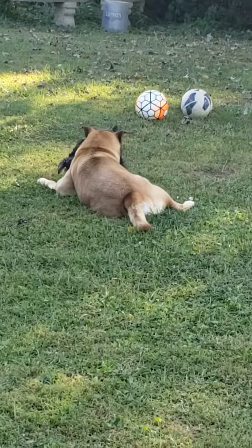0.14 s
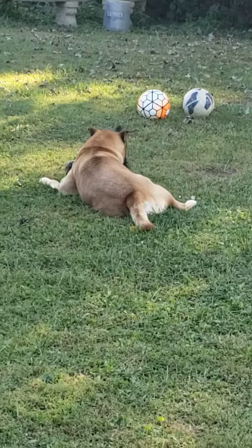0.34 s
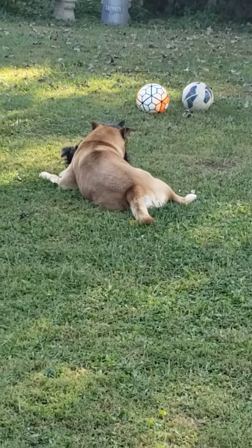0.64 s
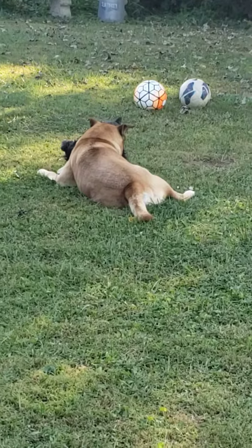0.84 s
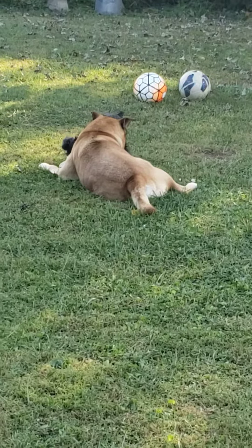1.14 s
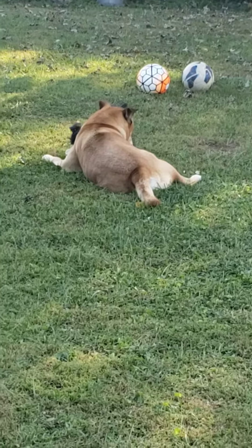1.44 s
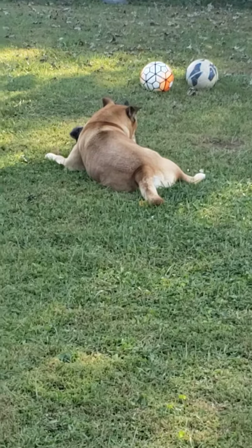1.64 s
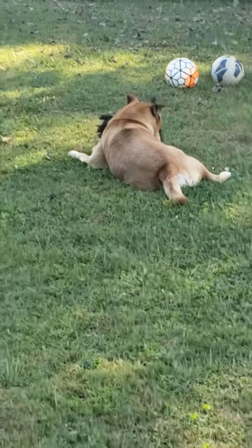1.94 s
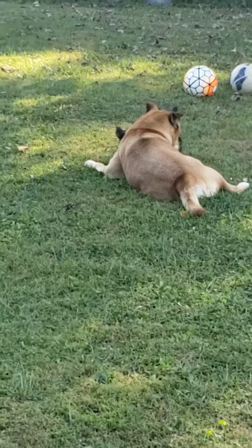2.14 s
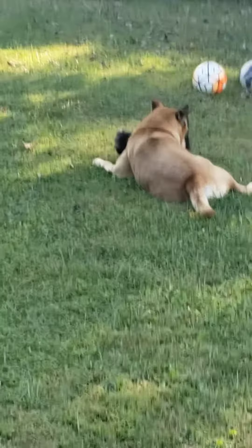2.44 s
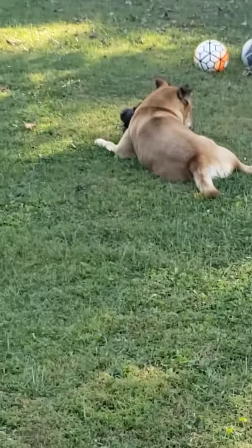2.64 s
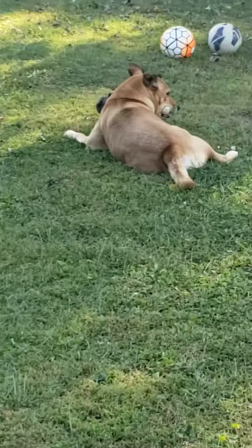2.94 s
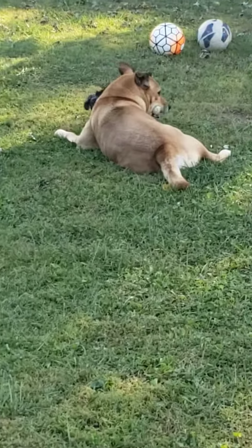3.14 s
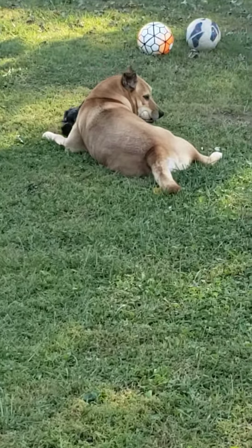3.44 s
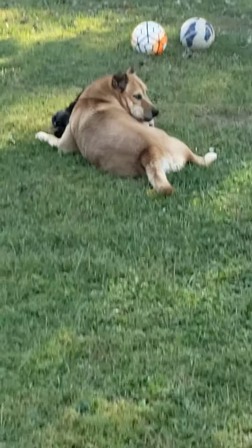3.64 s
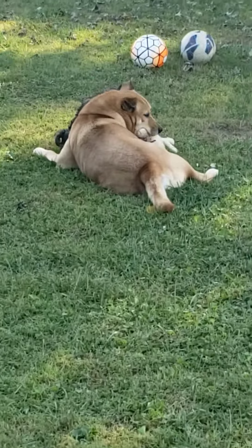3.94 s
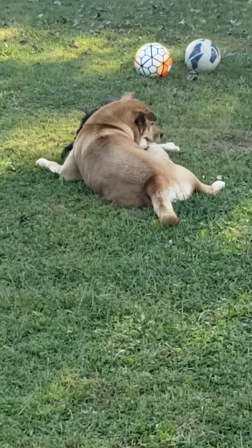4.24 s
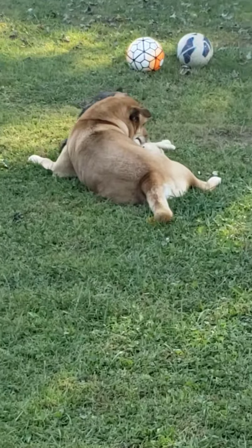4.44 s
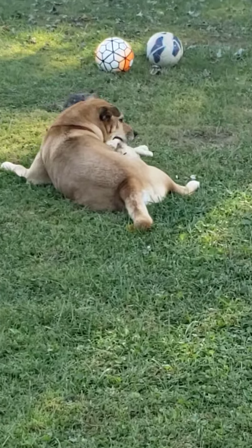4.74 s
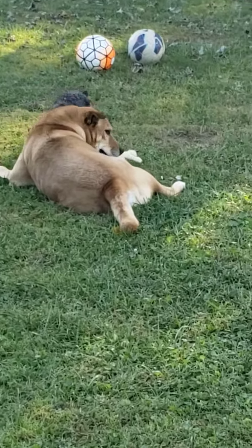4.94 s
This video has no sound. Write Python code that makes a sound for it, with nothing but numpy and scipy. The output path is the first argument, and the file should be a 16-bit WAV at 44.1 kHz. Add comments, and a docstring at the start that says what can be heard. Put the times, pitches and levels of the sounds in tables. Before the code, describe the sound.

A hand-held phone picks up a constant throbbing cicada chorus and uneven traffic rumble from afar. Low wind flutters come and go on the left, peaking in a cluster of dull thumps around 1.9 seconds, then mostly die away after three. Close crisp fabric rubs, tiny snaps and light casing taps follow on the right, with one faint distant whistle and a late gentle swell of noise. The dog makes no sound.

```python
"""Cicadas on a summer evening

A lawn: cicadas buzz in the trees, their noise clicks throbbing and coloured into a chorus, over the
shaped noise of distant traffic. Faint gliding tones whistle far off and a soft swell of noise whooshes.
Low noise and ringing eddies are wind on the left microphone port of a hand-held phone; dense grains
of rustling cloth and finger taps that ring the casing come from near the right port."""
import sys
import numpy as np
from scipy import signal
from scipy.fft import rfft, irfft
from scipy.io import wavfile
from scipy.ndimage import uniform_filter1d

SR = 44100
rng = np.random.default_rng(int(sys.argv[2]) if len(sys.argv) > 2 else 0)


def dump(signal):
    """Clip the signal to [-1, 1] and save it as 16-bit WAV at the path in sys.argv[1]."""
    limited = np.clip(np.atleast_2d(signal).T, -1, 1)
    pcm = np.round(limited * 32767).astype(np.int16)
    wavfile.write(sys.argv[1], SR, pcm)


N = 224160


def from_db(db):
    """Amplitude gain of a level in dB."""
    return 10 ** (np.asarray(db) / 20)


def rms_one(x):
    """Scale a signal to rms 1."""
    return x / np.sqrt(np.mean(x ** 2) + 1e-20)


def in_time(rows):
    """Value of a (time_s, value) curve at every sample, joined by straight lines."""
    return np.interp(np.arange(N) / SR, *np.transpose(rows))


def columns_at_hz(table):
    """Each value column of a table over the FFT bins, joined on a log frequency axis."""
    hz, *columns = np.transpose(table)
    log_bins = np.log(np.arange(N // 2 + 1) * SR / N + 1)   # 1 Hz added: no log of zero
    values = np.array([np.interp(log_bins, np.log(hz), column) for column in columns])
    return values, np.exp(log_bins), hz


def coloured(x, table):
    """Give unit white noise the table's dB per Hz, one column per channel, steeply closed at both ends."""
    level_db, bins, hz = columns_at_hz(table)
    skirt = 1 / (1 + (hz[0] / bins) ** 8) / (1 + (bins / hz[-1]) ** 8)
    return irfft(rfft(x) * from_db(level_db) * skirt, N) * np.sqrt(SR / 2)


def drift(rate_hz):
    """Random wander of rms 1: white noise through two equal low-pass poles at rate_hz."""
    r = np.exp(-2 * np.pi * rate_hz / SR)
    noise = rng.standard_normal(N + SR)
    settled = signal.lfilter([1], [1, -2 * r, r * r], noise)[SR:]
    return rms_one(settled)


def ring(clicks, hz, t60_s):
    """A resonance: each unit click starts a sine of height 1 that decays by 60 dB in t60_s."""
    r = from_db(-60 / (t60_s * SR))
    w = 2 * np.pi * hz / SR
    return signal.lfilter([0, np.sin(w)], [1, -2 * r * np.cos(w), r * r], clicks + 1e-18)


def strikes(times_s, gains):
    """One single-sample click per event."""
    clicks = np.zeros(N)
    clicks[np.round(np.array(times_s) * SR).astype(int)] = gains
    return clicks


def swell_db(start_s, hold_s, rise_db_per_s, fall_db_per_s):
    """Level that rises to 0 dB at the start, holds and falls, in straight lines of dB."""
    t = np.arange(N) / SR - start_s
    return np.minimum(0, np.minimum(rise_db_per_s * t, fall_db_per_s * (hold_s - t)))


def traffic():
    """Distant noise: long waves reach both ports alike, the right a little later; bass and hush swell apart."""
    # colour before the swells: pitch_hz, left_db_per_hz, right_db_per_hz
    far_colour = [(21.9, -100, -86), (31.7, -84, -76), (43.3, -74, -73.5), (72, -67.5, -67.5),
                  (111.4, -74, -77), (153, -83.5, -84.5), (220, -85.5, -85.5), (425, -93.5, -100),
                  (540, -87, -98), (754, -89.5, -90.5), (915, -89, -95.5), (1560, -92, -99),
                  (2010, -87, -104.5), (2300, -91.5, -103), (2930, -107, -109), (4920, -113, -115)]
    # left-right likeness: pitch_hz, correlation (0-1)
    likeness = [(60, 0.93), (130, 1), (290, 0.91), (640, 1), (1410, 0.08), (3100, 0.32), (6820, 0.03),
                (15000, 0.01)]
    # swell of the bass: time_s, level_db
    bass_swell = [(0, -1), (1.1, 2), (1.4, 5), (1.8, 1.5), (2.4, 0), (2.65, -4.5), (3.1, 2), (3.55, -2.5),
                  (3.85, 2), (4.4, -5.5), (5.08, 0)]
    # swell of the hush above the bass: time_s, level_db
    hush_swell = [(0, -0.5), (.6, 0), (2.6, 0.97), (4.2, -0.2), (4.7, 1), (4.92, 2), (5.08, 1)]
    right_lag_s = 0.00025

    alike = columns_at_hz(likeness)[0][0]
    left, other = rfft(rng.standard_normal((2, N)))
    lag = np.exp(-2j * np.pi * np.arange(N // 2 + 1) * SR / N * right_lag_s)
    right = alike * left * lag + np.sqrt(1 - alike ** 2) * other
    far = coloured(irfft([left, right], N), far_colour)
    bass = signal.sosfiltfilt(signal.butter(2, 150, fs=SR, output="sos"), far)
    hush = far - bass
    return hush * from_db(in_time(hush_swell)) + bass * from_db(in_time(bass_swell))


def whistle():
    """Far breathy tones, perhaps birds: slow noise rides on a sine that sags in pitch; echoes blur it."""
    # whistles: start_s, hold_s, start_hz, sag_hz_per_s, nominal level_db, left_minus_right_db
    calls = [(3.92, 0.1, 3590, 1200, -78, 0), (3.93, .06, 2780, 1100, -81, 6)]
    # echoes off the trees: delay_s, level_db
    echoes = [(.047, -3), (.11, -8)]
    rise_db_per_s, fall_db_per_s = 200, 120

    direct = np.zeros((2, N))
    for start_s, hold_s, start_hz, sag_hz_per_s, call_db, pan_db in calls:
        hz = start_hz - sag_hz_per_s * (np.arange(N) / SR - start_s)
        breath = 1 + 0.3 * drift(30)
        phase = 2 * np.pi * np.cumsum(hz) / SR + 1.1 * drift(40)
        level_db = call_db + swell_db(start_s, hold_s, rise_db_per_s, fall_db_per_s)
        direct += from_db(level_db) * breath * np.sin(phase) * from_db([[pan_db / 2], [-pan_db / 2]])
    echoed = sum(from_db(db) * np.roll(direct, int(delay_s * SR), axis=1) for delay_s, db in echoes)
    return direct + echoed


def whoosh():
    """Far soft noise in two broad bands swells once and fades."""
    # the swell, one row: start_s, hold_s, rise_db_per_s, fall_db_per_s
    envelope = (4.8, 0.16, 42, 140)
    # colour at full swell: pitch_hz, left_db_per_hz, right_db_per_hz
    bands = [(283, -100, -102), (370, -91, -85), (483, -104, -106), (1610, -106, -112), (2180, -87, -99),
             (2760, -106, -112)]
    return from_db(swell_db(*envelope)) * coloured(rng.standard_normal(N), bands)


def taps():
    """Each finger tap cracks the high modes of the casing; the soft fingertip then knocks the low ones."""
    # finger taps: time_s, strength_db, crack_db against the knock
    touches = [(1.9785, -51, -20), (2.0674, -37.5, -10), (2.4545, -49, -24), (3.303, -64, 4),
               (3.864, -51, -14), (4.546, -54, -8)]
    # low casing modes: pitch_hz, left_db, right_db, t60_s
    low_modes = [(290, -10, 0, 0.01), (440, 9.5, 7.5, 0.011), (630, 11, 16, 0.0036), (940, 8.5, 9, 0.0061)]
    # high casing modes: pitch_hz, left_db, right_db, t60_s
    high_modes = [(2620, -12, -3, .005), (4720, -5, 3.5, 0.0038), (6500, -6, 4, 0.0072),
                  (9900, -24, 6, 0.0052), (11300, -22, -4, 0.0031)]
    knock_lag_s = 0.0002   # the low modes answer a little after the crack

    time_s, strength_db, crack_db = np.transpose(touches)
    crack = strikes(time_s, from_db(strength_db + crack_db))
    soft = signal.butter(2, [240, 1100], "band", fs=SR, output="sos")
    knock = signal.sosfilt(soft, strikes(time_s + knock_lag_s, from_db(strength_db)))
    out = np.zeros((2, N))
    for modes, clicks in ((high_modes, crack), (low_modes, knock)):
        for k, (hz, left_db, right_db, t60_s) in enumerate(modes):
            sign = (-1) ** k   # neighbouring modes start in opposite phase
            out += sign * from_db([[left_db], [right_db]]) * ring(clicks, hz, t60_s)
    return out


def cloth():
    """Fibres slip in dense clumped grains under each rub, with a brightness of its own; a few fibres snap."""
    # colour of the rustle, only its shape counts: pitch_hz, left_db_per_hz, right_db_per_hz
    fabric = [(1460, 5.5, -11), (2940, -4, -7.5), (4540, -9, -9), (7500, 4.5, -6), (8900, -30, -5.5),
              (9800, -22, -1.5), (10400, -29, -10), (11900, -12, -1), (14400, -20, -10), (15000, -20, -14),
              (18000, -29, -18)]
    # rubs: start_s, hold_s, nominal level_db of the 8.5-12.5 kHz part, lift_db of the top above 14.6 kHz
    rubs = [(1.33, 0.03, -73, 16), (1.42, 0.34, -78, 14), (1.888, 0.063, -74.5, 9), (2.073, 0.032, -75, 10),
            (2.3, 0.32, -86, -2), (2.737, 0.25, -85, 19), (3.16, 0.018, -74, 9), (3.31, .05, -78.5, 3),
            (3.39, .03, -86, 10), (3.44, 0.02, -72, 16), (3.481, 0.014, -68, 15), (3.59, .04, -85, 4),
            (3.658, .07, -78, 15), (3.76, 0.027, -75, 20), (3.854, 0.096, -77.5, 16), (4.02, .15, -86, -2),
            (4.214, .015, -74, 10), (4.3, 0.057, -78.5, 17), (4.437, 0.13, -74, 13), (4.65, .25, -83, 0),
            (4.937, .05, -75, 14)]
    # single fibres snapping, level at the right port: time_s, peak_db, pitch_hz
    fibres = [(3.452, -56, 12300), (3.503, -54, 12400), (3.77, -56, 15400), (3.802, -53, 15200),
              (4.214, -53, 12000), (4.43, -58, 12300), (4.517, -56, 12300), (4.547, -43, 12600),
              (4.554, -51, 12800)]
    rise_db_per_s, fall_db_per_s = 172, 157
    patchy_db, snap_t60_s = 1.8, 0.0034

    sizes = from_db(2.0 * np.minimum(rng.exponential(1, (2, N)), 5))
    grains_per_s = 12000 * from_db(1.5 * drift(40))
    slips = rng.random((2, N)) < grains_per_s / SR
    rustle = coloured(sizes * rng.standard_normal((2, N)) * slips, fabric)
    band_filter = signal.butter(4, [8500, 12500], "band", fs=SR, output="sos")
    band = signal.sosfilt(band_filter, rustle.mean(axis=0))   # reference for the rub levels
    top = signal.sosfiltfilt(signal.butter(4, 14600, "high", fs=SR, output="sos"), rustle)
    body = rustle - top

    power = np.array([from_db(db + swell_db(start_s, hold_s, rise_db_per_s, fall_db_per_s)) ** 2
                      for start_s, hold_s, db, _ in rubs])
    top_power = from_db([lift_db for *_, lift_db in rubs]) ** 2 @ power
    # body and top flicker apart
    body_gain = np.sqrt(power.sum(axis=0)) * from_db(patchy_db * drift(19))
    top_gain = np.sqrt(top_power) * from_db(patchy_db * drift(17))
    rubbed = (body_gain * body + top_gain * top) / band.std()
    snaps = sum(ring(strikes([s], from_db(db)), hz, snap_t60_s) for s, db, hz in fibres)
    return rubbed + snaps * from_db([[-25], [0]])


def wind():
    """Turbulence on the left port: lumpy low noise under the gusts, and single eddies as damped thumps."""
    # strength of the breeze before the lumps: time_s, rms_db
    gusts = [(.1, -54), (.4, -63), (.58, -43), (.7, -54), (.87, -44.5), (1.15, -66), (1.28, -49),
             (1.42, -41), (1.49, -59), (1.62, -51), (1.7, -38), (1.76, -34.5), (1.8, -51), (1.83, -37),
             (1.93, -37), (2, -50), (2.09, -35.5), (2.15, -47), (2.3, -46.5), (2.6, -68), (2.84, -51),
             (2.93, -52), (3.01, -51), (3.05, -59), (3.3, -51.5), (3.55, -70), (4.2, -64), (5.08, -64)]
    # colour of the turbulence, only its shape counts: pitch_hz, level_db_per_hz
    turbulence = [(15, -18), (30, 5), (50, 7), (72, 8), (105, -11), (150, -14), (210, -19.5), (300, -31.5),
                  (400, -37)]
    # eddies that thump the port: time_s, push_db, pitch_hz, t60_s
    eddies = [(0.663, -30, 62, 0.15), (.727, -34, 52, .12), (1.301, -31, 75, .1), (1.468, -23.5, 67, 0.064),
              (1.7315, -20, 76, 0.07), (1.754, -24, 85, .06), (1.774, -23.5, 71, .17), (1.84, -25, 82, .1),
              (1.862, -13, 98, 0.055), (1.877, -22, 68, .12), (1.905, -30, 75, .1), (1.951, -30, 55, .1),
              (2.14, -24.5, 58, 0.11), (2.918, -28.5, 56, 0.12), (2.954, -29, 56, .1)]
    lumpy_db, lumps_hz = 3, 5.3

    noise = coloured(rng.standard_normal(N), turbulence)[0]
    even = noise / np.sqrt(uniform_filter1d(noise ** 2, size=3000) + 1e-20)   # the gusts set the level
    gust_db = np.interp(np.arange(N) / SR, *np.transpose(gusts), right=-90)
    left = even * from_db(gust_db + lumpy_db * drift(lumps_hz))
    soften = signal.butter(4, 200, fs=SR, output="sos")
    for time_s, push_db, hz, t60_s in eddies:
        push = signal.sosfilt(soften, strikes([time_s], -from_db(push_db)))   # a soft push, not a click
        left += ring(push, hz, t60_s)
    return np.array([left, from_db(-30) * left])


def cicadas():
    """Far clicks merge to an even buzz; each near singer throbs at its own pitch and overtone, wavering."""
    # buzz and overtone at each port, before the swell: pitch_hz, left_db_per_hz, right_db_per_hz
    chorus = [(4470, -112, -119), (5120, -104, -116), (5480, -101, -109), (5880, -105, -111),
              (6205, -91.5, -101), (6370, -87, -97.5), (6870, -79.5, -92.5), (7000, -83, -93.5),
              (7220, -80, -102), (7657, -95, -108), (8020, -106, -112), (8450, -124, -110),
              (8980, -126, -108), (9630, -126, -116), (11100, -124, -127), (12450, -114, -116),
              (12550, -109, -113), (13900, -104, -114), (14700, -109, -116), (17500, -116, -118)]
    # nearer singers: mean bursts_per_s, throb depth (0-1), pitch_hz, width_hz, share of left buzz power (0-1)
    singers = [(46.2, 1, 7660, 500, 0.5), (44.9, .6, 7550, 430, 0.09), (75.5, 1, 7260, 280, 0.25),
               (121, 1, 7250, 410, 0.06), (91.4, 0.3, 6000, 700, 0.13), (70.8, 0.1, 5200, 390, 0.22)]
    # loudness of the chorus: time_s, level_db
    chorus_swell = [(0, 0.5), (.4, 0.5), (1.2, 1.5), (2, 1.5), (3, 2), (4, 1.5), (5.08, 1.5)]
    waver_db, clicks_per_s = 1.2, 20000

    bins = np.arange(N // 2 + 1) * SR / N
    near, taken = 0, 0
    for bursts_per_s, depth, hz, width_hz, share in singers:
        turn = 2 * np.pi * np.cumsum(bursts_per_s * (1 + 0.01117 * drift(2.43))) / SR
        throb = (1 + depth * np.cos(turn)) ** 2 * from_db(waver_db * drift(2.15))
        clicks = rng.standard_normal((2, N)) * (rng.random((2, N)) < clicks_per_s / SR) * throb
        pitch = np.exp(-0.5 * ((bins - hz) / width_hz) ** 2)
        overtone = 0.92 * np.exp(-0.5 * ((bins - 1.64 * hz) / (2 * width_hz)) ** 2)
        power = share * (pitch + overtone) * np.array([[1], [0.4]])   # the right port faces away from them
        near = near + np.sqrt(power) * rfft(rms_one(clicks))
        taken = taken + power
    # the even crowd fills what the near singers leave
    crowd = np.sqrt(np.clip(1 - taken, 0, 1)) * rfft(rng.standard_normal((2, N)))
    loudness = from_db(in_time(chorus_swell) + 0.25 * drift(3.0))
    return coloured(irfft(near + crowd, N), chorus) * loudness


def scene():
    """All sources as they reach the two ports."""
    return traffic() + whistle() + whoosh() + taps() + cloth() + wind() + cicadas()


def record(dry):
    """The microphones lose the deepest bass; the top is cut above 15.8 kHz."""
    lean = signal.sosfilt(signal.butter(2, 36, "high", fs=SR, output="sos"), dry)
    return signal.sosfilt(signal.ellip(12, 0.5, 60, 15800, fs=SR, output="sos"), lean)


dry = scene()
out = record(dry)
dump(out)
```